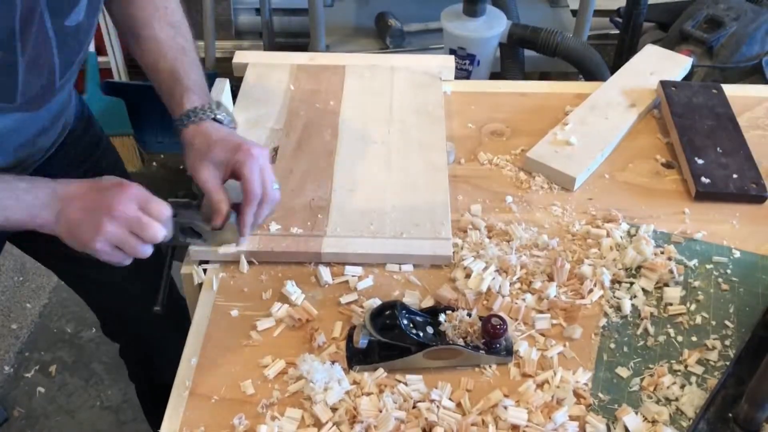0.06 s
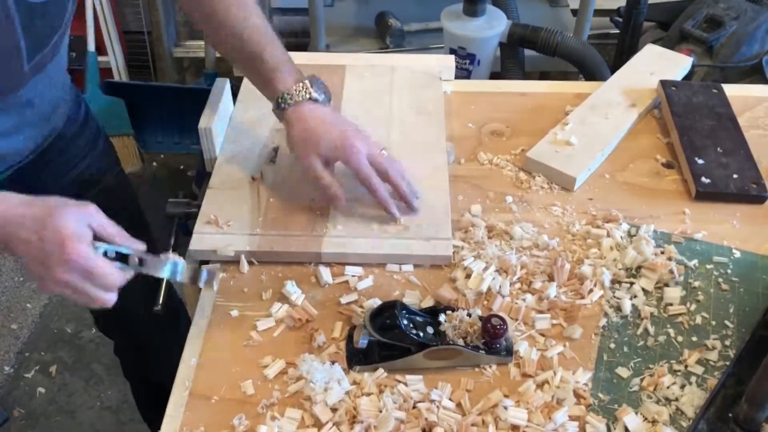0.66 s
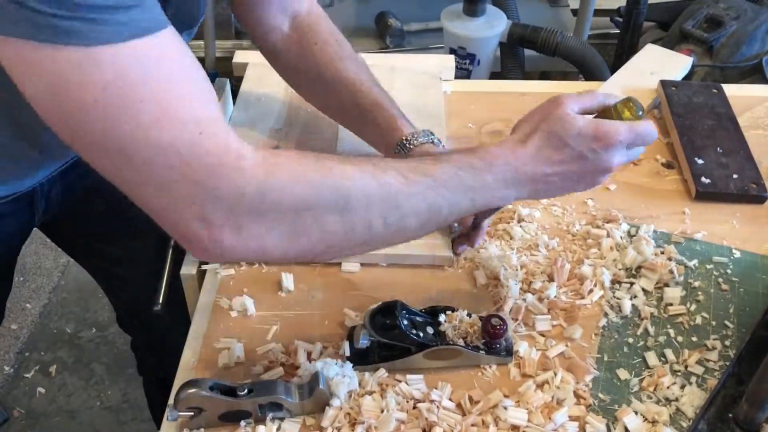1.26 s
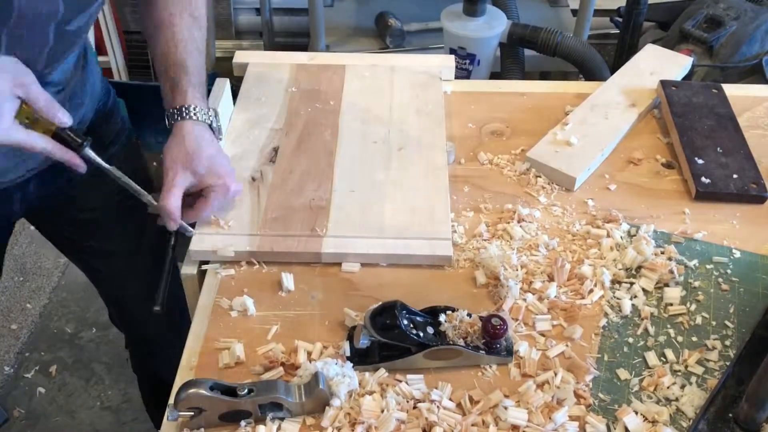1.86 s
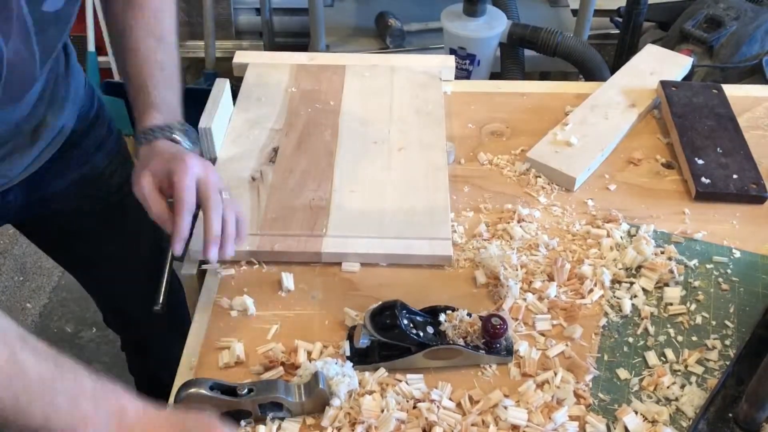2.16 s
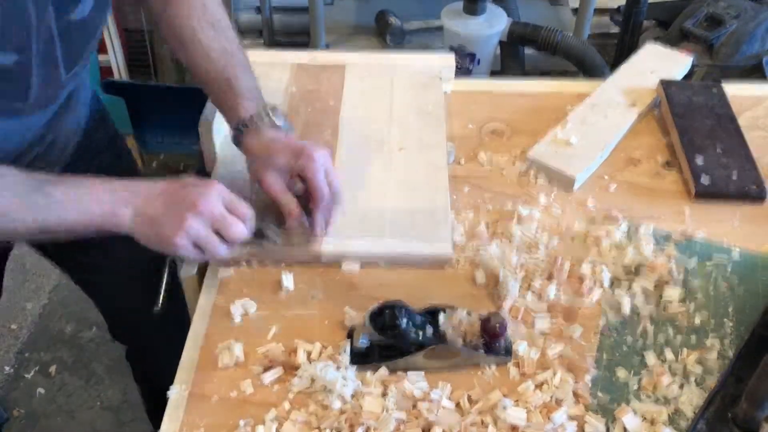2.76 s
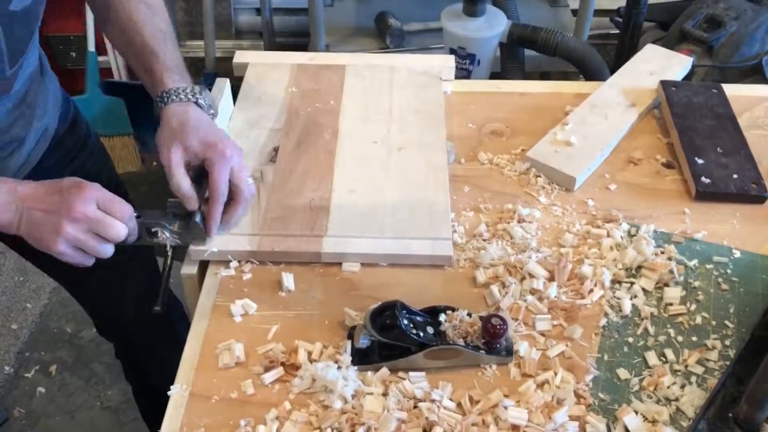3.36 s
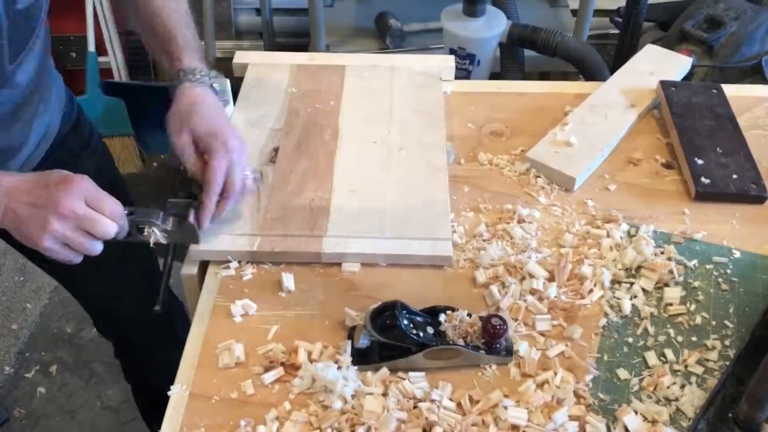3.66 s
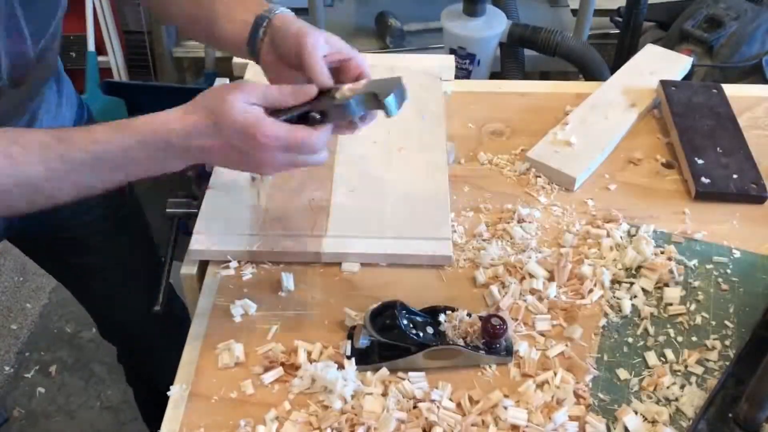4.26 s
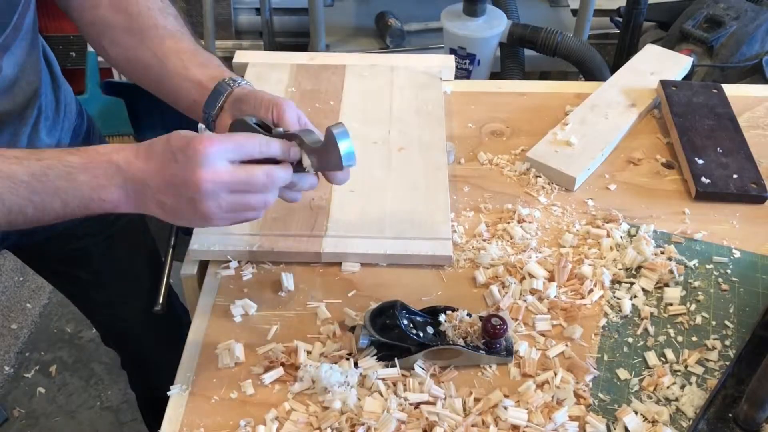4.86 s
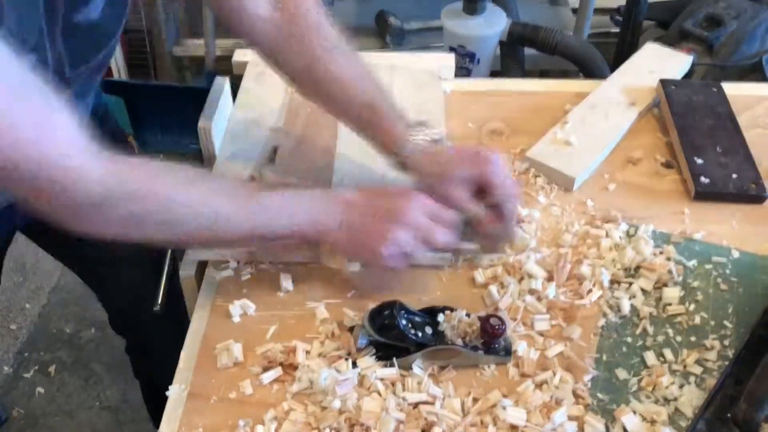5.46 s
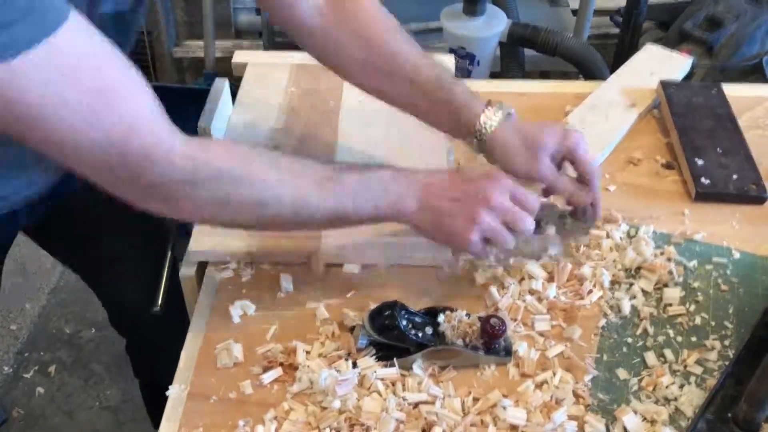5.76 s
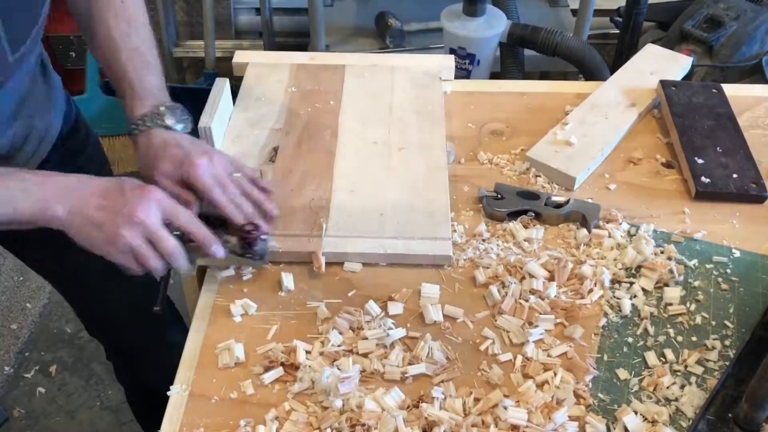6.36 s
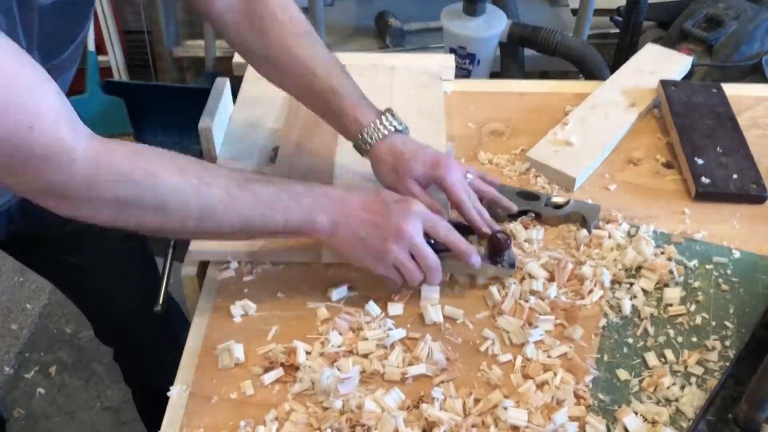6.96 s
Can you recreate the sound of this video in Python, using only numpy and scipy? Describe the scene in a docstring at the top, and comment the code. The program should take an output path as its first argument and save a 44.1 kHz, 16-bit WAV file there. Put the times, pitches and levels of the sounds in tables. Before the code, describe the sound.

Close up in a small, dry workshop, someone trims wood with a hand plane: short, crisp scrapes in irregular groups, each with little taps of the metal sole on the board. In the gaps come soft rubbing, rustling shavings and tools set down on a wooden bench. A few harder clacks stand out in the second half, and it finishes with five quick, bright planing strokes over a faint room hush.

```python
"""In a small, dry workshop a woodworker trims the end of a board with a metal shoulder plane, then
with a block plane. The sole knocks down and slides; the iron bites and tears a shaving. Cutting and
friction are trains of tiny fibre snaps, filtered by the resonances of plane and board. In between,
tools are laid on the bench, each impact ringing the body it strikes, and a hand sweeps shavings away.
Nearby clutter scatters the sound, and the walls add a faint tail over the hush of the room."""
import sys
import numpy as np
from scipy import signal
from scipy.fft import rfft, irfft
from scipy.io import wavfile
from scipy.ndimage import uniform_filter1d, minimum_filter1d

SR = 44100
rng = np.random.default_rng(int(sys.argv[2]) if len(sys.argv) > 2 else 0)


def store_pcm(level_fs):
    """Save levels as 16-bit WAV."""
    pcm = np.round(np.clip(level_fs, -1, 1) * 32767).astype(np.int16)
    wavfile.write(sys.argv[1], SR, np.atleast_2d(pcm).T)


N = 317942
FFT_SIZE = 8192
HZ = np.fft.rfftfreq(FFT_SIZE, 1 / SR)
RUN_OUT_S, RASP_S = 0.0068, 0.011  # time constant of a cut's decay; half-width of its rasp

# Resonances of the shoulder plane on the board, and of the board itself.
# Each row: frequency in Hz, bandwidth in Hz, lift in dB.
PLANE_MODES = [(1524,190,6),(2800,170,4),(3230,60,1),(4720,33,-3.5),(5570,180,0)]
BOARD_MODES = [(348,9.1,11),(1446,34,6.4)]
# Spectral envelopes of the tapped board, the bench top and a snapping shaving.
# Each row: frequency in Hz, relative level in dB.
TAP_SPECTRUM = [(150,-47),(340,-24.5),(550,-10),(730,-18),(900,1.5),(1080,4),(1300,-7),(2200,-5),(3800,-11.5),(6000,-19),(10000,-30),(15500,-34.5)]
BENCH_SPECTRUM = [(150,-49.5),(340,-7.5),(600,-2),(900,8),(1250,5),(1750,8),(3000,-7),(6000,-16.5),(15500,-27.5)]
TICK_SPECTRUM = [(300,-22.5),(2000,-14),(6000,2.5),(9000,8.5),(15500,2.5)]


def shoulder_cuts(fizz_hz=7500, rasp_hz=5400, hollow_hz=1450):
    """Source and filter: fibres torn by the iron excite the resonances of iron and plane."""
    # Each row: start and length in seconds, place of the crest from 0 to 1, then levels of bite, sag
    # and crest, fizz of tearing fibres and hollowness, all in dB.
    cuts = [(0.24, 0.1, 0.87, -20, -21.5, -16, 3.5, -2), (0.61, 0.076, 0.68, -13, -24.5, -15, 3.5, -1.5),
            (2.919, 0.079, .7, -15.5, -23, -13.5, 4.5, 1), (3.218, 0.095, 0.63, -12.5, -23, -14, 4.5, 0),
            (3.7005, 0.057, 0.73, -11, -25, -12, 6, -0.5), (4.012, 0.023, 0.65, -14.5, -12, -16, -3, -2),
            (4.053, 0.091, 0.73, -17, -17, -13, 4.5, 3), (5.567, 0.073, 0.89, -15, -14.5, -10.5, 5, 4),
            (5.868, 0.059, 0.82, -19, -28, -21, 6.5, 12.5)]
    # Each row: frequency in Hz, relative level in dB.
    spectrum = [(100,-57),(200,-37),(330,-12.5),(750,-14),(1000,-2.5),(1250,-6.5),(2600,2.5),(4100,3),(5700,3.5),(8000,1),(10000,-6.5),(15500,-1.5)]
    # Resonances of the cutting iron. Each row: frequency in Hz, bandwidth in Hz, lift in dB.
    iron_modes = [(2950,230,8),(5650,70,5),(5810,37,9.5)]
    tearing = fibres(per_s=9000, spread_db=1, chatter_db=3, chatter_hz=390) * strokes(cuts, cut_force)
    cut = through(tearing, body(spectrum, PLANE_MODES + iron_modes))
    treble = signal.sosfiltfilt(signal.butter(2, fizz_hz, "high", fs=SR, output="sos"), cut)
    fizz = treble * strokes(cuts, cut_fizz)
    rasp = resonate(cut, rasp_hz + strokes(cuts, rasp_glide), width_hz=760) * strokes(cuts, rasp_swell)
    hollow = resonate(cut, hollow_hz, width_hz=490) * strokes(cuts, cut_hollow)
    return amp(-1.5) * (cut + rasp + fizz + hollow)


def cut_course(length, crest, swell_share=0.23):
    """Time base of a cut: seconds since the bite, and the moments of bite, sag, crest and end."""
    t = np.arange(0, length + 6 * RUN_OUT_S, 1 / SR)
    return t, length * np.sort(np.clip([0, crest - swell_share, crest, 1], 0, 1))


def cut_force(length, crest, bite_db, sag_db, crest_db, *colour, rise_s=0.0075, ease_db=-7):
    """Amplitude envelope: the iron bites, slows in the wood, speeds up to a crest and runs out."""
    t, moments = cut_course(length, crest)
    gate = np.minimum(t / rise_s, 1) * np.exp(-np.maximum(t - length, 0) / RUN_OUT_S)
    return gate * amp(np.interp(t, moments, [bite_db, sag_db, crest_db, crest_db + ease_db]))


def cut_fizz(length, crest, bite_db, sag_db, crest_db, fizz_db, hollow_db):
    """Treble shelf: its gain grows by 6.5 dB from bite to crest as the shaving forms."""
    t, moments = cut_course(length, crest)
    return amp(fizz_db - 6.5 * np.maximum(1 - t / moments[2], 0)) - 1


def cut_hollow(length, crest, bite_db, sag_db, crest_db, fizz_db, hollow_db):
    """Resonance of the plane pressed on the board: it grows by 11 dB as the plane overhangs the edge."""
    t, _ = cut_course(length, crest)
    return amp(hollow_db - 2 + 11 * np.minimum(t / length, 1) ** 4) - 1


def rasp_swell(length, crest, *levels):
    """Gaussian envelope: the shaving's rasp comes and goes around the crest."""
    t, moments = cut_course(length, crest)
    return np.exp(-((t - moments[2]) / RASP_S) ** 2 / 2)


def rasp_glide(length, crest, *levels, rise_hz_per_s=44000):
    """Linear glide: the rasp's offset in Hz from its pitch at the crest."""
    t, moments = cut_course(length, crest)
    return rise_hz_per_s * np.clip(t - moments[2], -2 * RASP_S, 2 * RASP_S)


def shoulder_slides():
    """Sliding friction: the sole scrapes over the grain and excites the plane's resonances."""
    # Each row: start in seconds, length in seconds, level in dB.
    slides = [(0.158, 0.033, -45), (0.194, 0.018, -27.5), (0.226, 0.02, -27), (0.551, 0.013, -31),
              (0.57, 0.037, -47.5), (2.838, 0.041, -28), (2.879, 0.03, -29), (2.906, 0.035, -26.5),
              (3.098, 0.047, -36), (3.198, 0.0078, -29.5), (3.907, 0.024, -40.5), (5.367, 0.029, -39.5),
              (5.471, 0.024, -23.5), (5.505, 0.036, -24), (5.821, 0.024, -31), (5.843, 0.049, -30)]
    # Each row: frequency in Hz, relative level in dB.
    spectrum = [(100,-54.5),(330,-23),(750,-16),(1000,3.5),(1220,-25.5),(1600,-5),(2800,1),(4000,-3),(6000,-8),(10000,-19),(15500,-18.5)]
    friction = fibres(per_s=14000, spread_db=-3.5, chatter_db=-5, chatter_hz=200)
    return through(friction * strokes(slides, arch, fullness=0.47), body(spectrum, PLANE_MODES))


def block_pushes(zip_hz=6360, wander_hz=200):
    """Fracture noise: each push tears a shaving, whose bright zip wanders with the plane's speed."""
    # Each row: start in seconds, time until release in seconds, level in dB.
    pushes = [(6.624, 0.017, -20), (6.759, 0.02, -19.5), (6.889, 0.023, -18), (7.02, 0.015, -16),
              (7.162, 0.011, -12)]
    # Each row: frequency in Hz, relative level in dB.
    spectrum = [(100,-78),(330,-31),(650,-25),(950,-8),(1280,-24.5),(1600,-7.5),(5000,-8.5),(6500,-6),(8000,-4.5),(10500,-6),(15500,-8.5)]
    tearing = fibres(per_s=16000, spread_db=3, chatter_db=1.5, chatter_hz=320)
    tearing *= strokes(pushes, push_force)
    zipping = amp(3) * resonate(tearing, zip_hz + wander_hz * wobble(40), width_hz=650)
    return amp(-2) * through(tearing + zipping, body(spectrum, BOARD_MODES))


def push_force(release_s, db, rise_s=0.0093, fall_s=0.013):
    """Amplitude envelope of a push: linear attack, hold, exponential decay."""
    t = np.arange(0, .1, 1 / SR)
    return amp(db) * np.minimum(t / rise_s, 1) * np.exp(-np.maximum(t - release_s, 0) / fall_s)


def block_drags():
    """Sliding friction: drawn back between pushes, the block plane scrapes the board more dully."""
    # Each row: start in seconds, length in seconds, level in dB.
    drags = [(6.524, 0.044, -32), (6.565, 0.046, -25.5), (6.692, 0.062, -25.5), (6.82, 0.065, -27.5),
             (6.942, 0.07, -26), (7.084, 0.064, -24.5)]
    # Each row: frequency in Hz, relative level in dB.
    spectrum = [(100,-55),(330,-20.5),(700,-12),(1050,-1),(1280,-11.5),(1600,-2.5),(2300,-4.5),(2900,4),(4200,-6.5),(6500,-5),(8000,-3.5),(9400,-1.5),(11500,-8),(15500,-5.5)]
    friction = fibres(per_s=14000, spread_db=2.5, chatter_db=2, chatter_hz=218)
    return through(friction * strokes(drags, arch, fullness=0.38), body(spectrum, BOARD_MODES))


def knocks():
    """Impact excitation: tools ring board, bench and plane; shavings snap; hands and feet bump."""
    # Tools touching the board, and tools laid on the bench or lifted off it.
    # Each row: start in seconds, then level, hollowness and sharpness in dB.
    taps = [(0.0738, -47, 0.5, 2), (0.1172, -49, 15, -13.5), (0.197, -36, -2.5, 2),
            (0.459, -31.5, -8.5, -9), (0.5108, -33, 6, 2.5), (0.5278, -35, -14.5, 4),
            (0.5529, -33, 15, 8.5), (0.5617, -37.5, -9, -25.5), (0.7524, -38.5, -14.5, -2),
            (1.3163, -51, -5, -5), (1.5339, -48.5, -3.5, -12), (1.57, -44.5, -3.5, -6),
            (1.6695, -46, 5, -3), (1.987, -45, 3, 11.5), (2.7227, -30.5, 8, -2), (2.751, -36, -10.5, -2),
            (2.7911, -42, 12, -0.5), (3.001, -30.5, -12.5, -9), (3.091, -33, 0.5, 1),
            (3.1726, -40.5, 5.5, 4), (3.305, -35, 4.5, -8), (3.4636, -27.5, -3, -5), (3.524, -26, 1, 6.5),
            (3.5557, -41, -23.5, 2), (3.6, -34, -14, 1), (3.643, -41, -3, 4), (3.6671, -34.5, -6, 4.5),
            (3.968, -28, 1.5, 0), (5.3148, -38.5, -10, -10.5), (5.659, -35, -5.5, -19),
            (5.7804, -40.5, 17.5, 9), (5.7978, -36, 6, 6.5), (6.3973, -48.5, -2, -20), (6.684, -43, 1, -6),
            (6.8835, -36, 12, -12), (7.0125, -36, 5, -13)]
    bench_knocks = [(0.913, -30, -2, 4.5), (1.0015, -31, -18, -10), (1.0372, -42.5, 13, 16),
                    (1.0616, -34, -18, -27), (1.0984, -37.5, -9, -1), (1.1156, -33.5, -6, 8),
                    (2.0565, -49, -18, -10), (2.0733, -38.5, -10, 2), (2.1175, -43, -18, -5),
                    (2.1337, -34, 3, -1), (2.2975, -36.5, 5, 19.5), (2.3366, -41, 0, -3),
                    (2.4391, -40.5, -7, -9)]
    # The plane striking hard. Each row: as above, then a favoured ring in Hz and its lift in dB.
    clacks = [(4.1746, -11, -2.5, 6, 896, 7), (5.9357, -14, 1, -15.5, 1420, 8.5),
              (6.2434, -17.5, -2.5, -6, 1570, -3), (6.4885, -22.5, -0.5, 12.5, 3830, 11),
              (6.6205, -26, 18, -5, 2270, 10), (7.155, -21, 11.5, 5, 2800, -8)]
    # Dry shavings snapping, and soft bumps. Each row: start in seconds, level in dB.
    ticks = [(2.1881, -58.5), (2.3669, -62), (4.4459, -66.5), (4.5209, -60.5), (4.6823, -64), (5.0768, -59),
             (6.0227, -64), (6.0493, -61.5), (6.6937, -37)]
    bumps = [(0.383, -49), (1.273, -53), (4.581, -35), (4.96, -51.5), (6.084, -55), (6.174, -53),
             (6.276, -47)]
    # Each row: frequency in Hz, relative level in dB.
    clack_spectrum = [(80,-52),(150,-53.5),(330,-28.5),(600,-15),(950,-5),(1300,-11),(1500,0),(2100,1),(3000,1),(5300,-3),(8000,-9.5),(15500,-20.5)]
    bump_spectrum = [(60,-48),(105,-37),(150,-1.5),(320,9),(550,0.5),(900,-9),(1500,-26),(6000,-27.5)]
    # Resonances of the bench top. Each row: frequency in Hz, bandwidth in Hz, lift in dB.
    bench_modes = [(345,14,7),(850,18,12.5),(1410,45,4)]
    return (blows(taps, body(TAP_SPECTRUM, BOARD_MODES), gain_db=1, lag_s=.0014, near_db=-4)
            + blows(bench_knocks, body(BENCH_SPECTRUM, bench_modes), gain_db=-2, lag_s=.0016, near_db=-5)
            + blows(clacks, body(clack_spectrum, PLANE_MODES), gain_db=-0.5, lag_s=.0005, near_db=-6.5)
            + blows(ticks, body(TICK_SPECTRUM), gain_db=3, lag_s=.0005, near_db=-1)
            + blows(bumps, body(bump_spectrum), gain_db=-9, lag_s=.001, near_db=-2))


def blows(rows, response, gain_db, lag_s, near_db):
    """Impulse response: each blow rings a body and scatters off the things around it."""
    out, lead = np.zeros(N), 64  # samples kept ahead of the onset
    for s, db, *colour in rows:
        blow = ring(response * contact(*colour) * struck_spot())
        blow = irfft(rfft(blow) * dispersion(lag_s))
        blow = signal.oaconvolve(np.roll(blow, lead)[:FFT_SIZE * 3 // 4], surroundings(near_db))
        blow *= np.sqrt(SR / 50) / np.linalg.norm(blow)  # the energy of 20 ms at unit RMS
        add(out, s - lead / SR, amp(db + gain_db) * blow)
    return out


def contact(hollow_db=0, sharp_db=0, ring_hz=0, ring_db=-100, width_hz=150):
    """Excitation spectrum: where and how hard a blow lands shifts mids and treble and may favour a ring."""
    mids_db = hollow_db * HZ ** 3 / (HZ ** 3 + 450 ** 3) / (1 + (HZ / 1400) ** 5)
    treble_db = sharp_db * HZ ** 3 / (HZ ** 3 + 5000 ** 3)
    return amp(mids_db + treble_db) * np.sqrt(1 + peak(ring_hz, width_hz, ring_db))


def struck_spot(uneven_db=3, spacing_hz=220):
    """Modal coupling: each spot that is struck favours some resonances and starves others."""
    hz = np.arange(0, SR / 2, spacing_hz)
    return amp(uneven_db * np.interp(HZ, hz, rng.standard_normal(len(hz))))


def dispersion(lag_s):
    """Bending waves disperse: low pitches arrive late (lag_s at 1 kHz), by paths of unequal length."""
    paths_s = np.interp(HZ, np.linspace(0, SR / 2, 40), rng.uniform(0, .0014, 40))
    delay_s = lag_s * np.sqrt(1000 / np.maximum(HZ, 100)) + paths_s
    return np.exp(-2j * np.pi * np.cumsum(delay_s) * HZ[1])


def grazes():
    """Glancing friction: an edge brushes the wood before a tool lands; bare steel scrapes brighter."""
    # Each row: start in seconds, length in seconds, level in dB.
    wood_grazes = [(.008, 0.047, -45), (.503, 0.0081, -33.5), (.908, 0.0069, -40), (.995, 0.0091, -37.5),
                   (3.944, 0.02, -44.5), (6.481, 0.011, -33)]
    steel_scrapes = [(1.097, 0.011, -36), (1.115, 0.011, -30.5), (2.347, 0.0069, -44), (4.17, 0.0024, -22)]
    # Each row: frequency in Hz, relative level in dB.
    steel_spectrum = [(300,-31.5),(3000,0),(5500,2),(7300,-11),(15500,-18)]
    friction = fibres(per_s=6700, spread_db=4, chatter_db=2, chatter_hz=202.3)
    wood = through(friction * strokes(wood_grazes, arch, fullness=.3), body(TAP_SPECTRUM, BOARD_MODES))
    steel = through(friction * strokes(steel_scrapes, arch, fullness=.3), body(steel_spectrum))
    return wood + steel


def handling():
    """Light friction: a palm sweeps shavings, steel and skin rub wood, tools scuff, crumbs crackle."""
    # Each row: start in seconds, length in seconds, level in dB.
    sweeps = [(1.115, 0.071, -50.5), (1.198, 0.068, -43), (1.805, 0.054, -47), (2.265, 0.057, -49.5),
              (2.61, 0.086, -51)]
    rubs = [(1.315, 0.1, -54.5), (1.68, 0.12, -54.5), (1.912, 0.049, -53.5), (2.32, 0.14, -57),
            (3.34, 0.074, -49.5), (3.79, 0.071, -48), (4.57, .1, -57), (4.91, 0.14, -59),
            (6.135, 0.093, -57.5)]
    scuffs = [(1.03, 0.16, -42), (1.53, 0.2, -54), (1.99, 0.13, -49.5), (2.3, 0.079, -49)]
    # Each row: frequency in Hz, relative level in dB.
    sweep_spectrum = [(100,-48.5),(330,-13),(900,-2),(1600,-13),(3200,3.5),(5500,-3.5),(7000,0),(8500,0),(10000,-2),(11500,0),(15500,-9.5)]
    rub_spectrum = [(100,-29),(300,-9),(600,2.5),(1500,-3.5),(3200,-1.5),(6500,-7),(8500,0),(9800,-7),(11200,-1.5),(15500,-12)]
    sweep = fibres(per_s=20000, spread_db=1, chatter_db=1, chatter_hz=120)
    sweep *= strokes(sweeps, arch, fullness=.55)
    rub = fibres(per_s=19000, spread_db=2, chatter_db=1.8, chatter_hz=60)
    rub *= strokes(rubs, arch, fullness=.6)
    scuff = fibres(per_s=1500, spread_db=3, chatter_db=2.5, chatter_hz=60)
    scuff *= strokes(scuffs, arch, fullness=.4)
    crumbs = fibres(per_s=90, spread_db=4, chatter_db=4, chatter_hz=4)
    return (through(sweep, body(sweep_spectrum))
            + amp(-1) * through(rub, body(rub_spectrum))
            + amp(-2) * through(scuff, body(BENCH_SPECTRUM, BOARD_MODES))
            + amp(-76) * through(crumbs, body(TICK_SPECTRUM)))


def surroundings(near_db):
    """Early reflections: the direct sound and its scatter off bench and clutter, for one position."""
    # Each row: frequency in Hz, time to decay by 60 dB in seconds.
    decay_times = [(300,0.16),(1000,0.098),(3000,0.084),(14000,0.071)]
    response = amp(near_db) * echoes(decay_times, delay_s=0.0008, length_s=.15)
    response[0] = 1
    return response / np.linalg.norm(response)


def moving(x, near_db=-3, change_s=.04, count=5):
    """Moving source: as the tool travels, its sound crossfades through a few sets of reflections."""
    places = [surroundings(near_db) for _ in range(count)]
    hop = round(change_s * SR)
    fade, out = signal.windows.hann(2 * hop, sym=False), np.zeros(N)
    for k, start in enumerate(range(0, N, hop)):
        part = x[start:start + 2 * hop]
        add(out, start / SR, signal.fftconvolve(part * fade[:len(part)], places[k % count]))
    return out


def workshop(x, tail_db=-22):
    """Reverberation: the walls add a faint tail."""
    # Each row: frequency in Hz, time to decay by 60 dB in seconds.
    decay_times = [(300,0.67),(900,0.11),(2000,0.091),(14000,0.19)]
    return x + amp(tail_db) * signal.oaconvolve(x, echoes(decay_times, delay_s=0.0084, length_s=.5))[:N]


def room_hush(level_db=-63):
    """Ambient noise: a steady hush, strongest in the low mids."""
    # Each row: frequency in Hz, relative level in dB.
    spectrum = [(30, -31), (117, -34), (197, -17), (237, -30), (284, 5), (332, -9.5), (399, -8.5),
                (639, -5.5), (691, -2), (830, -6), (2070, -7), (4660, -15.5), (8000, -18.5), (15500, -23)]
    return amp(level_db) * through(rng.standard_normal(N), body(spectrum))


def echoes(decay_times, delay_s, length_s):
    """Diffuse field: dense reflections of unit energy, each band decaying at its own rate."""
    hz, t, bands = signal.stft(rng.standard_normal(round(length_s * SR)), SR, nperseg=128)
    tail = signal.istft(bands * amp(-60 * t / read(decay_times, hz)[:, None]), SR, nperseg=128)[1]
    tail *= np.clip(np.arange(len(tail)) / SR / delay_s - .5, 0, 1)
    return tail / np.linalg.norm(tail)


def fibres(per_s, spread_db, chatter_db, chatter_hz):
    """Shot noise: fibres catch and snap, unequal in size and modulated by the chatter of the tool."""
    size = amp(spread_db * np.minimum(rng.exponential(1, N), 3))
    snaps = size * rng.choice([-1, 1], N) * (rng.random(N) < per_s / SR)
    return unit_rms(snaps * amp(chatter_db * wobble(chatter_hz)))


def wobble(rate_hz):
    """Random modulation: low-passed noise of unit RMS."""
    return unit_rms(signal.sosfilt(signal.butter(2, rate_hz, fs=SR, output="sos"), rng.standard_normal(N)))


def arch(length, db, fullness):
    """Sine envelope: a rub gathers speed and slows again; a lower fullness flattens its top."""
    return amp(db) * np.sin(np.pi * np.arange(0, 1, 1 / (length * SR))) ** fullness


def strokes(rows, shape, **manner):
    """Superposition: one shape in time for each row of a stroke table."""
    curve = np.zeros(N)
    for s, *row in rows:
        add(curve, s, shape(*row, **manner))
    return curve


def body(spectrum, modes=(), rounding_hz=45):
    """Frequency response: a smoothed spectral envelope lifted by resonances."""
    bell = signal.windows.gaussian(101, rounding_hz * FFT_SIZE / SR)
    padded_db = np.pad(read(spectrum, HZ), len(bell) // 2, "edge")
    shape_db = np.convolve(padded_db, bell / bell.sum(), "valid")
    return amp(shape_db) * np.sqrt(1 + sum(peak(*mode) for mode in modes))


def peak(hz, width_hz, db):
    """Lorentzian power curve of one damped mode."""
    return amp(db) ** 2 / (1 + (2 * (HZ - hz) / width_hz) ** 2)


def ring(gain):
    """Minimum-phase impulse response of unit energy for a gain curve."""
    cepstrum = irfft(np.log(np.maximum(gain, 1e-6)))
    cepstrum[1:FFT_SIZE // 2] *= 2
    cepstrum[FFT_SIZE // 2 + 1:] = 0
    response = irfft(np.exp(rfft(cepstrum)))
    return response / np.linalg.norm(response)


def through(x, gain):
    """Convolution of an excitation with a body's impulse response."""
    return signal.oaconvolve(x, ring(gain))[:N]


def resonate(x, hz, width_hz):
    """Resonance of unit gain, steady or gliding in pitch."""
    carrier = np.exp(2j * np.pi * np.cumsum(hz * np.ones(N)) / SR)
    pole = np.exp(-np.pi * width_hz / SR)
    return 2 * (carrier * signal.lfilter([1 - pole], [1, -pole], x / carrier + 1e-18)).real


def amp(db):
    """Decibels as an amplitude ratio."""
    return 10 ** (np.asarray(db) / 20)


def unit_rms(x):
    """Normalisation to unit power."""
    return x / np.sqrt(np.mean(x ** 2) + 1e-20)


def read(points, hz):
    """Interpolation over log frequency."""
    point_hz, value = np.transpose(points)
    return np.interp(np.log(hz + 1), np.log(point_hz + 1), value)


def add(mix, s, sound):
    """Superposition of a sound on the mix, from s seconds on."""
    part = mix[max(round(s * SR), 0):][:len(sound)]
    part += sound[:len(part)]


def scene():
    """Superposition: strokes and knocks reverberate in the workshop, over its hush."""
    hush = room_hush()
    planing = shoulder_cuts() + shoulder_slides() + block_pushes() + block_drags()
    work = moving(planing + handling() + grazes()) + knocks()
    return (workshop(work) + hush)[None]


def record(dry, bass_cut_hz=130, band_edge_hz=15950):
    """Peak limiting, then band limiting at both ends of the spectrum."""
    allowed = np.minimum(1, 1 / (np.abs(dry) + 1e-9))
    gain = uniform_filter1d(minimum_filter1d(allowed, 101), 101)
    thin = signal.sosfilt(signal.butter(3, bass_cut_hz, "high", fs=SR, output="sos"), dry * gain)
    low_pass = signal.firwin(511, band_edge_hz, window=("kaiser", 8), fs=SR)
    return signal.oaconvolve(thin, low_pass[None], "same")


dry = scene()
out = record(dry)
store_pcm(out)
```